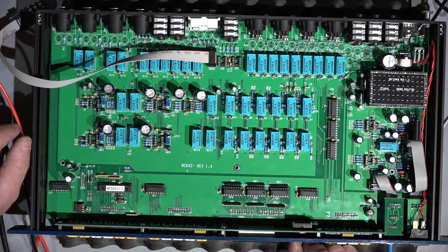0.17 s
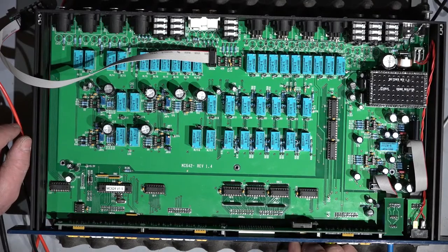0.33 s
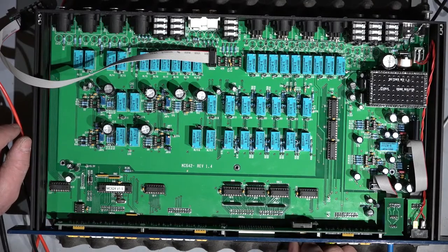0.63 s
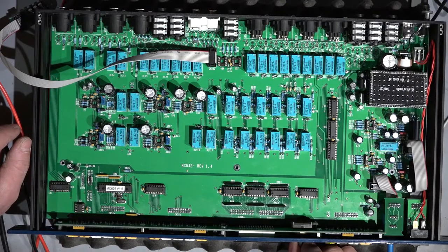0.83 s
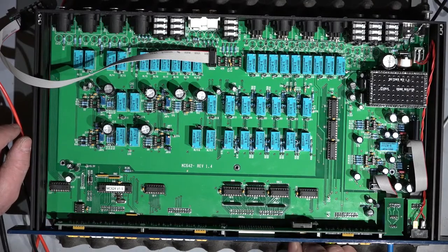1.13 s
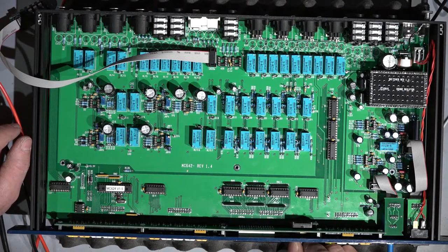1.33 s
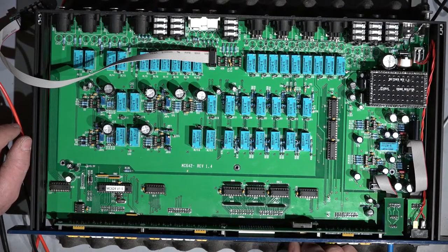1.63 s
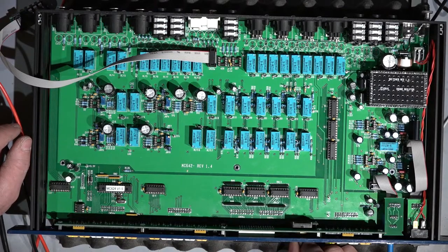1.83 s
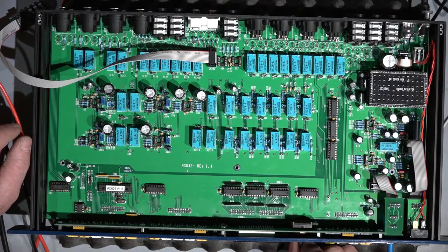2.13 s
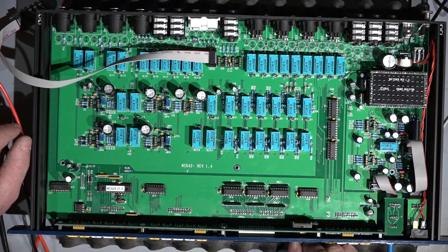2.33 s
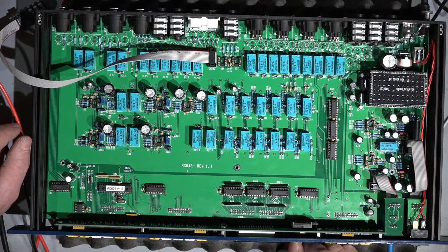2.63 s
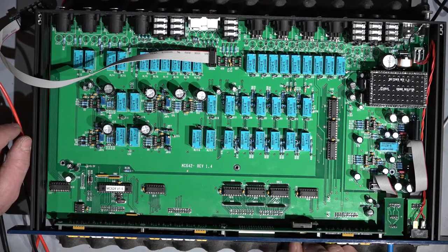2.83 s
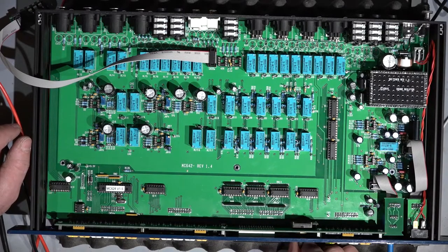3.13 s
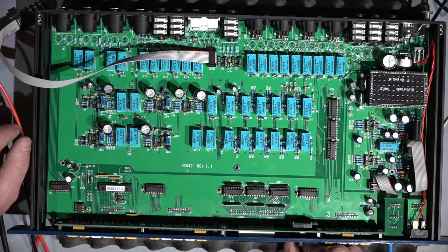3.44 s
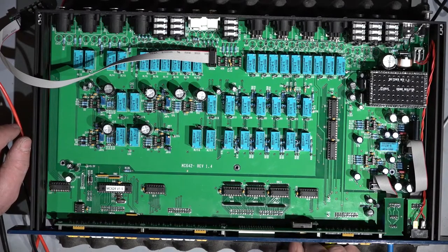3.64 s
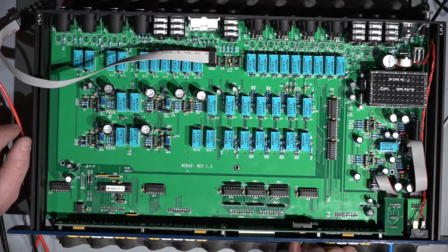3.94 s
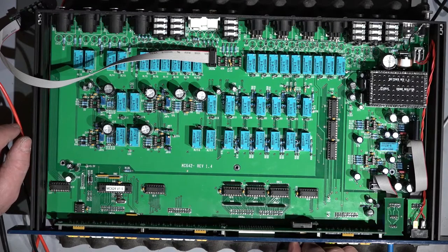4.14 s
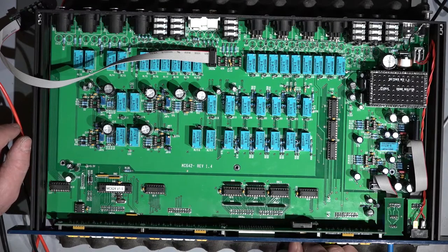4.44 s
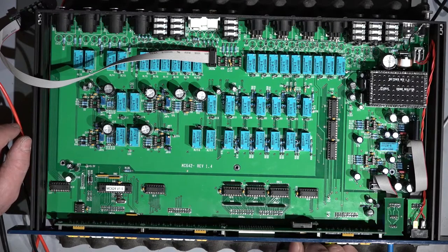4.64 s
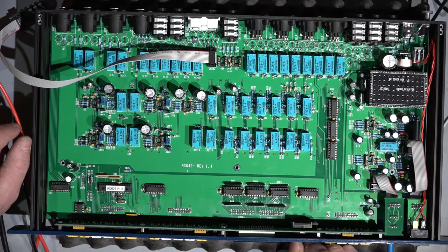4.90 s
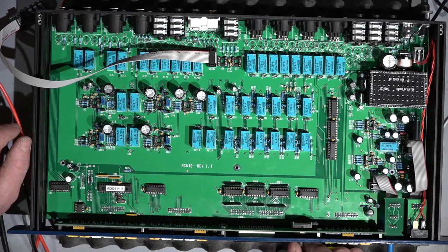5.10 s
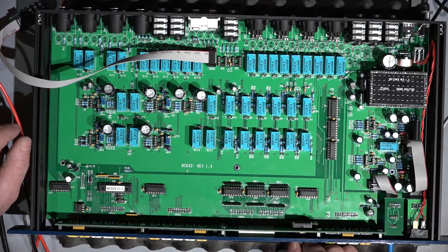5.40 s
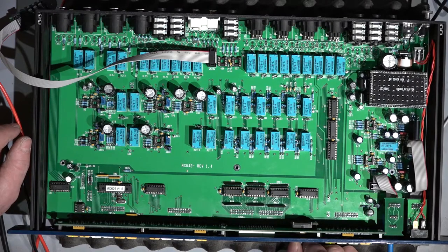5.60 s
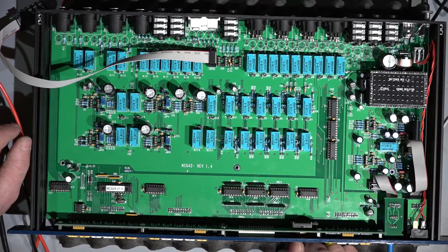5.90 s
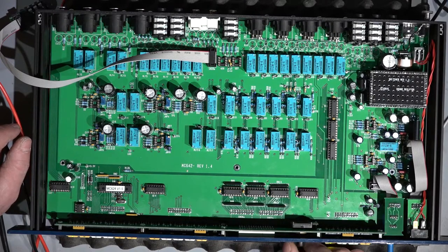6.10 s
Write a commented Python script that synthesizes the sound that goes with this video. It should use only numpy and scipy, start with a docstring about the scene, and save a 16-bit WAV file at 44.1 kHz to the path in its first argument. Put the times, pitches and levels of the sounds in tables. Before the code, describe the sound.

In a quiet, dry room with a soft rush of ventilation, banks of small relays switch close by, making crisp, bright clacks at uneven intervals. One lone relay adds a lighter click that is the same each time. After about three seconds comes a lull with faint button ticks, cloth brushing and a brief rub against the metal case. A few more clicks follow, then a last quick cluster.

```python
"""First comes a sharp clack: a bank of small relays (electric switches) on a circuit board, close by in
an open metal case. Each bank clacks because its relays land within a few milliseconds, shaking the board
and their housings; one lone relay gives the same lighter click every time. Between the runs come faint
button ticks, the brush of a sleeve and one hollow rub, over low ventilation in a quiet, dry workroom."""
import sys
import numpy as np
from scipy import signal
from scipy.fft import rfft, irfft, next_fast_len
from scipy.io import wavfile
from scipy.ndimage import uniform_filter1d

SR = 44100
rng = np.random.default_rng(int(sys.argv[2]) if len(sys.argv) > 2 else 0)


def store_pcm(level_fs):
    """Save levels as 16-bit WAV."""
    pcm = np.round(np.clip(level_fs, -1, 1) * 32767).astype(np.int16)
    wavfile.write(sys.argv[1], SR, np.atleast_2d(pcm).T)


N = 276106
SIZE = 16384   # samples in one click and its ringing
AGE = np.arange(SIZE) / SR   # seconds since the click began
FREQS = np.fft.rfftfreq(SIZE, 1 / SR)

# The clacks. Each row: start in seconds, level in dB, seconds from first landing to last, low knock in
# dB, brightness (higher is brighter), relative metal ring in dB, pitch of the loudest housing in Hz.
CLACKS = [(0.0034, -23, 0.0098, -3, -0.5, -3.5, 7900), (0.401, -25.5, 0.0065, 2, -1.5, -12, 13100),
          (0.441, -26, 0.0042, -2.5, -2, -4, 13800), (0.572, -26, 0.0085, -3.5, -1, -9, 11500),
          (0.7222, -27, 0.0061, -3, -3.5, -3, 10400), (1.077, -25, 0.0064, -3, -1.5, -7.5, 6840),
          (1.3373, -23, 0.0051, -1.5, 0.5, -3.5, 7200), (1.58, -26, 0.008, -1.8, -4.5, -10, 4200),
          (1.63, -26, 0.0071, -3, -2.5, -7, 14700), (1.758, -26, 0.0077, -2, 0, -12, 11200),
          (1.9015, -27.5, 0.0087, 1, 2, -7, 10700), (2.3161, -25.5, 0.0091, -2.5, 0, -1, 6070),
          (2.4055, -23, .008, -1.5, -0.5, -6, 11100), (2.9679, -27, 0.0051, 1.5, 0.5, -9, 9400),
          (2.9958, -24.5, 0.0071, -7, -4, -10, 8900), (3.0199, -26, 0.0076, -2, -2, -12, 14400),
          (3.0631, -25, 0.0091, -5.5, -1, -7, 11100), (3.1155, -26, 0.0039, -2, -1, -5, 9100),
          (4.4202, -25, 0.0089, -3, -1.5, -5, 12300), (4.55, -23.5, 0.0088, 1.3, 2.5, -3.5, 4070),
          (5.3363, -25, 0.005, -3.5, -1, -4.5, 6900), (5.353, -30, 0.0023, 0.5, -2, -6, 6500),
          (5.368, -23.5, .0034, -3, -2.5, -2.5, 12200), (5.5213, -26, 0.0096, -1, -2.5, -9, 6700),
          (5.7094, -22.5, 0.0093, -.8, 0, -5, 7400), (5.8277, -26, .0073, -1.7, -2, -1, 4070),
          (5.9564, -23, 0.006, -1.5, -2.5, -4, 12600)]
# The tone of a clack. Each row: frequency in Hz, gain in dB.
BANK_TONE = [(40, -8), (90, -26.5), (220, -17), (700, -12.5), (1400, -12), (2400, -7.5), (5000, -5.5),
             (5850, -9.5), (6700, 0.5), (8800, -8), (10800, -5.5), (12500, -3), (14600, -7), (15700, -19)]
# Where board and housings ring. Each row: pitch in Hz, width in Hz, boost in dB.
BANK_RESONANCES = [(350, 52, 9.5), (518, 38, 8), (971, 61, 10.5), (1573, 8.4, 7), (1923, 56, 8.5),
                   (2160, 180, 6), (2543, 88, 8.5), (2772, 98, 5.5), (3110, 380, 5), (3670, 33, 6.5),
                   (4240, 130, 0.5), (4533, 55, 9.5), (5300, 430, 6.5), (6220, 55, 7), (7000, 160, 5),
                   (7890, 240, 5.5), (8300, 270, 5.5), (9540, 700, 6.5), (11380, 173, 4.5), (11600, 340, 3),
                   (12650, 200, 7), (14400, 420, 8.5)]
def relay_banks(count=7):
    """The relays of a bank land one after another; their place on the board colours the clack."""
    out = np.zeros(N)
    board_db = at_hz(BANK_TONE, FREQS) + resonance_db(BANK_RESONANCES)
    for start, db, spread, knock_db, brightness, ring_db, housing_hz in CLACKS:
        landings = spread * np.linspace(0, 1, count)
        strengths_db = rng.normal(0, 1.04, count) - 8.2 * landings / spread
        strengths_db[0] -= 4.0   # the first relay lands alone
        bounce = (spread + 0.0053, -7.0)
        force = rattle([*zip(landings, strengths_db), bounce], fade_s=0.022)
        force += from_db(-22.5) * echo_tail(build_s=0.0088)
        place_tone = [(1200, knock_db), (3500, 0.52 * brightness), (7000, 0), (12000, 0.81 * brightness)]
        body_db = board_db + at_hz(place_tone, FREQS) + resonance_db([(housing_hz, 420, 5.0)])
        clack = at_level(through_body(flatten(force, bins=400), body_db), db)
        ring = from_db(db + ring_db - 14.0) * metal_ring()
        wash = room_wash(db=db - 14.5, build_s=0.0068)
        thump = board_thump(hz=111, fade_s=0.033, db=db - 19.5)
        add(out, clack + ring + wash + thump, start)
    return out


# Metal parts that ring after a clack. Each row: pitch in Hz, relative level in dB, seconds to fade 60 dB.
SPRINGS = [(1538, -3, .2), (1634, -4.5, 0.17), (5270, -3, 0.2), (6760, 6, 0.11), (7300, -14, 0.26),
           (7270, -2, 0.2), (7900, -9, .14), (7560, 5, 0.17), (9600, -3, 0.17), (9800, -8, 0.15)]
def metal_ring(count=3):
    """Several alike springs ring together, each a little off pitch and out of step."""
    hz, db, fade_s = np.repeat(SPRINGS, count, axis=0).T[:, :, None]
    detune = 1 + rng.normal(0, 0.00864, hz.shape)
    phase = rng.uniform(0, 2 * np.pi, hz.shape)
    rings = fade(db, fade_s) * np.sin(2 * np.pi * hz * detune * AGE + phase)
    return rings.sum(axis=0) / np.sqrt(count)


# When the lone relay clicks. Each entry: start in seconds.
LONE_STARTS = [1.0445, 1.158, 2.2916, 2.3571, 2.5009, 4.3972, 4.4601, 4.8029, 5.4145, 5.5934, 5.773, 5.9055]
# The tiny hits within its click. Each row: seconds after the first hit, relative level in dB.
LONE_HITS = [(0, -8), (.0011, 7), (.0022, 5), (.0032, -0.5)]
# The tone of its click. Each row: frequency in Hz, gain in dB.
LONE_TONE = [(40, -24), (100, -7.5), (220, -6.5), (1300, -13.5), (2300, -17.5), (3000, 0.5), (4800, -8),
             (5800, -4.5), (6700, -1), (8900, -11), (11200, -8), (12700, -1.5), (14500, 1.5), (15700, -20)]
# Where it makes board and housing ring. Each row: pitch in Hz, width in Hz, boost in dB.
LONE_RESONANCES = [(362, 75, 1), (500, 32, 1.6), (923, 110, 7.7), (1616, 160, 12), (2100, 280, 13.7),
                   (2576, 110, 13), (2960, 79, 4.5), (3270, 220, 1.2), (3640, 240, 8.2), (4070, 84, 7.5),
                   (4530, 140, 14), (5200, 150, 12), (6300, 83, 8), (6500, 320, 3.2), (6880, 490, 9.3),
                   (7660, 110, 4), (8530, 250, 16), (9700, 458, 1.9), (13100, 380, 3.1), (12400, 190, 3.4),
                   (14500, 330, 3.6)]
def lone_relay(db=-32):
    """The same moving arm takes the same path each time, so its click repeats."""
    out = np.zeros(N)
    force = flatten(rattle(LONE_HITS, fade_s=0.014), bins=75)
    body_db = at_hz(LONE_TONE, FREQS) + resonance_db(LONE_RESONANCES)
    click = at_level(through_body(force, body_db), db)
    thump = board_thump(hz=127, fade_s=0.037, db=db - 21.0)
    for start in LONE_STARTS:
        wash = room_wash(db=db - 8.5, build_s=0.0033)
        add(out, click + wash + thump, start)
    return out


def rattle(hits, fade_s):
    """Each hit (seconds, dB) shakes a plastic housing into a quickly dying burst of noise."""
    power = sum((AGE >= s) * from_db(db - 60 * np.maximum(AGE - s, 0) / fade_s) ** 2 for s, db in hits)
    return np.sqrt(power / power.sum()) * rng.standard_normal(SIZE)


def board_thump(hz, fade_s, db):
    """The board bends under the relays' moving arms and gives a short, low thump."""
    return fade(db, fade_s) * np.sin(2 * np.pi * hz * AGE)


# Faint button ticks. Each row: start in seconds, relative level in dB, treble boost in dB.
BUTTON_TICKS = [(1.041, -59, 2), (2.2862, -55, -7), (2.558, -65, 1), (2.6477, -55, -9), (2.781, -51.5, -6),
                (3.278, -63, 11), (3.31, -52.5, 2), (3.333, -54, -4), (3.4635, -56.5, 0),
                (3.5537, -58.5, -5), (3.7833, -63, 14), (3.984, -61, 17), (4.0626, -59, 9),
                (4.176, -59.5, 3), (4.3893, -48, -7), (4.651, -56, -5), (5.333, -43, 14),
                (6.205, -57.5, -13)]
# The tone of a tick. Each row: frequency in Hz, gain in dB.
TICK_TONE = [(200, -13), (600, -6), (2000, -9.5), (3200, -1.5), (5500, -13), (9000, -15), (12500, -14.5),
             (16000, -41)]
def buttons():
    """A button makes one light hit for each tick."""
    out = np.zeros(N)
    for start, db, treble_db in BUTTON_TICKS:
        force = rattle([(0, 0)], fade_s=0.055)
        force += from_db(-30) * echo_tail(build_s=0.002)
        body_db = at_hz(TICK_TONE, FREQS) + at_hz([(3500, 0), (9000, treble_db)], FREQS)
        add(out, at_level(through_body(force, body_db), db - 1.5), start)
    return out


# Strokes of the sleeve. Each row: start in seconds, length in seconds, level in dB.
SLEEVE_STROKES = [(0.96, 0.36, -66), (1.51, 0.079, -63), (2.25, 0.36, -65), (2.84, 0.18, -67),
                  (3.18, 0.34, -62), (3.66, 0.14, -61), (3.917, 0.31, -67), (5.098, 0.078, -51.5),
                  (5.227, 0.095, -60.5), (6.03, 0.037, -55), (6.096, 0.086, -53)]
# The tone of the cloth. Each row: frequency in Hz, gain in dB.
SLEEVE_TONE = [(250, -6), (600, 6), (1200, 4.5), (2200, 3), (3000, -5.5), (5000, -7.5), (8000, -14.5),
               (16000, -20)]
def sleeve(rest_db=-72):
    """Cloth rubs with each stroke of a person's arm, which is never quite still."""
    power = sum((from_db(db) * swell(start, length, rise_s=0.019, fall_s=0.011)) ** 2
                for start, length, db in SLEEVE_STROKES)
    return np.sqrt(power + from_db(rest_db) ** 2) * noise(SLEEVE_TONE)


# The hollow tone of the rub. Each row: frequency in Hz, gain in dB.
RUB_TONE = [(200, -24), (400, -10), (550, -1.5), (800, -10), (1200, -16), (2500, -24), (6000, -30),
            (16000, -40)]
def case_rub(db=-46.5):
    """One short rub against the case makes a hollow puff of noise."""
    return from_db(db) * swell(start_s=3.483, hold_s=0.0035, rise_s=0.017, fall_s=0.009) * noise(RUB_TONE)


# How case and room ring on. Each row: frequency in Hz, seconds to fade 60 dB, relative level in dB.
ECHO_BANDS = [(92, 0.16, -31), (365, 0.16, -6), (1640, 0.15, -10.5), (4000, 0.14, -14), (8200, 0.14, -13.5),
              (15000, 0.12, -13)]
def echo_tail(build_s):
    """The blurred ringing of case and room builds up, then fades by octaves; the lows last longest."""
    bands, out = np.array(ECHO_BANDS), 0
    white = rfft(rng.standard_normal(SIZE))
    octaves = np.round(np.log2(np.clip(FREQS, 64, 16384)))
    for octave in np.unique(octaves):
        fade_s = at_hz(bands[:, [0, 1]], 2 ** octave)
        db = at_hz(bands[:, [0, 2]], 2 ** octave)
        out += irfft(white * (octaves == octave)) * fade(db, fade_s)
    return out * (1 - np.exp(-AGE / build_s))


# The tone that case and room scatter back. Each row: frequency in Hz, gain in dB.
ROOM_TONE = [(100, -16.5), (380, -12.5), (1200, -6), (2700, -8), (4000, 3), (6000, 3.5), (9000, 0),
             (11000, 0), (12500, 3.5), (15700, -8)]
def room_wash(db, build_s):
    """Echoes from all sides blend into a smooth wash behind a click."""
    return at_level(through_body(echo_tail(build_s), at_hz(ROOM_TONE, FREQS)), db)


# The tone of the ventilation. Each row: frequency in Hz, gain in dB.
AIR_TONE = [(30, -39), (60, -15.5), (95, -9.5), (150, -7.5), (280, -8), (350, 1), (440, -1.5), (520, -2),
            (750, -7.5), (1000, -10), (1600, -15), (2900, -21.5), (12000, -25), (16000, -34)]
def ventilation(db=-57):
    """Moving air makes a low, steady rush."""
    return from_db(db) * noise(AIR_TONE)


def through_body(force, gain_db):
    """Colour a hit so that the body rings after it, never before (a minimum-phase filter)."""
    cepstrum = irfft(np.log(from_db(gain_db)))
    cepstrum[1:SIZE // 2] *= 2   # move the ringing from before the hit to after it
    cepstrum[SIZE // 2 + 1:] = 0
    return irfft(rfft(force) * np.exp(rfft(cepstrum)))


def resonance_db(resonances):
    """A body boosts the frequencies near the pitches it rings at."""
    return sum(db / (1 + (2 * (FREQS - hz) / width) ** 2) for hz, width, db in resonances)


def flatten(force, bins):
    """Even out the broad humps in a burst's tone, so that only the body colours it."""
    power = uniform_filter1d(np.abs(rfft(force)) ** 2, bins)
    return through_body(force, -10 * np.log10(power + 1e-12))


def noise(tone):
    """Steady noise of a given tone, with an average (rms) level of 1."""
    size = next_fast_len(N)
    gain = from_db(at_hz(tone, np.fft.rfftfreq(size, 1 / SR)))
    hiss = irfft(rfft(rng.standard_normal(size)) * gain, size)[:N]
    return hiss / np.sqrt(np.mean(hiss ** 2) + 1e-20)


def swell(start_s, hold_s, rise_s, fall_s):
    """A loudness curve that rises until start_s, holds, then dies away."""
    age = np.arange(N) / SR - start_s
    return np.exp(np.minimum(age, 0) / rise_s - np.maximum(age - hold_s, 0) / fall_s)


def fade(db, fade_s):
    """A loudness curve that starts at db and drops 60 dB in fade_s seconds."""
    return from_db(db - 60 * AGE / fade_s)


def at_level(click, db):
    """Scale a click so that its first 20 milliseconds have an average (rms) level of db."""
    return from_db(db) * click / np.sqrt(np.mean(click[:SR // 50] ** 2))


def at_hz(points, hz):
    """Read between (Hz, value) rows, with all octaves equally wide."""
    point_hz, values = np.array(points).T
    return np.interp(np.log(np.maximum(hz, 1)), np.log(point_hz), values)


def from_db(db):
    """Turn decibels into a multiplier."""
    return 10 ** (np.asarray(db) / 20)


def add(out, sound, start_s):
    """Mix a sound in from start_s on."""
    start = max(round(start_s * SR), 0)
    out[start:start + len(sound)] += sound[:N - start]


def scene():
    """Relays in front; a person's small noises and the ventilation behind, in one channel."""
    handling = buttons() + sleeve() + case_rub()
    return (relay_banks() + lone_relay() + handling + ventilation())[None]


def record(dry):
    """The microphone drops the deep bass, rounds the highest peaks and cuts the very top steeply."""
    bass_cut = signal.butter(5, 60, "high", fs=SR, output="sos")
    top_cut = signal.ellip(10, 0.1, 80, 15900, fs=SR, output="sos")
    rounded = 0.5 * np.tanh(signal.sosfilt(bass_cut, dry) / 0.5)
    return signal.sosfilt(top_cut, rounded)


dry = scene()
out = record(dry)
store_pcm(out)
```